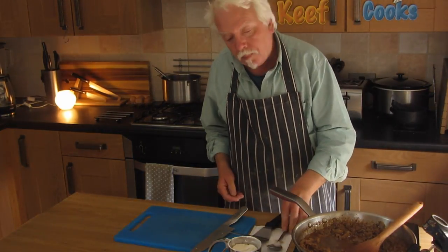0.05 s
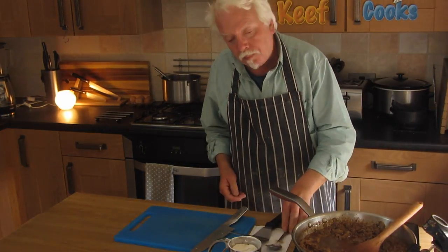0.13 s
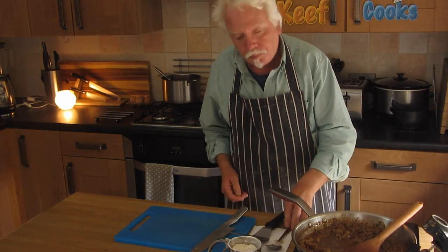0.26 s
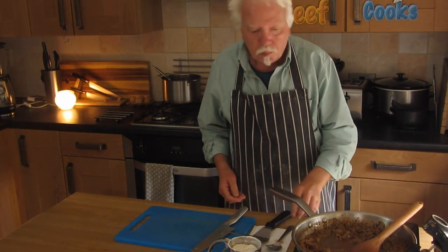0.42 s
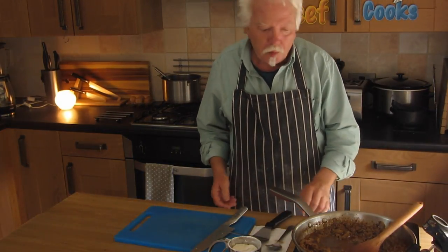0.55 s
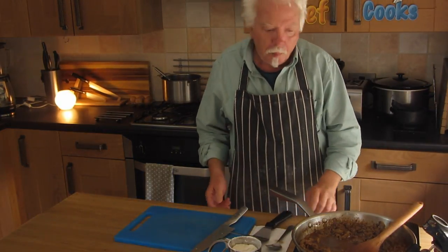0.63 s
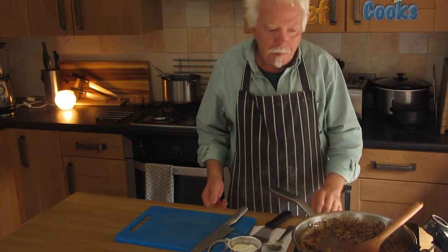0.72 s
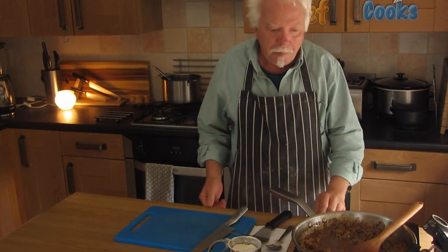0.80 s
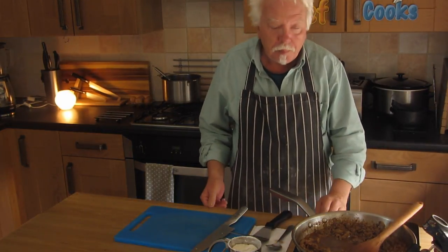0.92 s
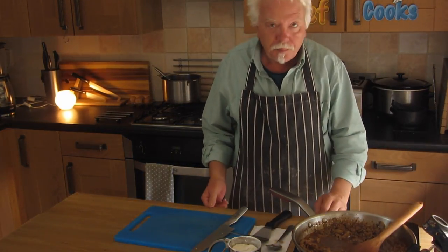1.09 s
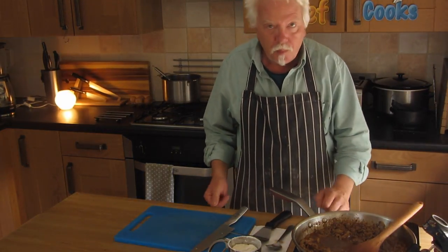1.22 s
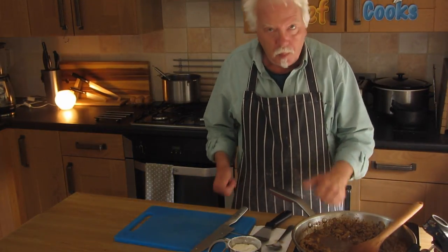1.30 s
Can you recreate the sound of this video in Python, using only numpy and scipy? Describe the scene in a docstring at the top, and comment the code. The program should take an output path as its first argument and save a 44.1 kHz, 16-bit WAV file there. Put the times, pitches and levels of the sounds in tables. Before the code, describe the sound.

A portable induction hob's fan rushes, hums and whines throughout, slightly to the left, with a pan faintly simmering. At about 0.2 seconds a hard utensil lands on the worktop with a loud rattling knock that overloads the microphone and rings briefly in the kitchen. Light ticks follow from 0.7 to 1.3 seconds, the clearest at 0.8. Soft low thumps come on the right around 0.2, 0.6 and 1.2 seconds.

```python
"""A fan rushes through a resonant case and whines on four blade harmonics: a portable induction hob
under a simmering pan. A hard utensil is put down on the worktop; the knock rings in the kitchen and
overloads the microphone. Light ticks follow. A few soft low thumps reach mainly the right side."""
import sys
import numpy as np
from scipy import signal
from scipy.fft import rfft, irfft, next_fast_len
from scipy.io import wavfile
from scipy.ndimage import map_coordinates

SR = 44100
rng = np.random.default_rng(int(sys.argv[2]) if len(sys.argv) > 2 else 0)


def generate_wav(sig):
    """Save sig (samples, or channels by samples) to the path in sys.argv[1] as 16-bit PCM at SR."""
    pcm = np.round(np.clip(np.atleast_2d(sig).T, -1, 1) * 32767).astype(np.int16)
    wavfile.write(sys.argv[1], SR, pcm)


N = 59535


def amp(db):
    return 10 ** (np.asarray(db) / 20)


def unit_rms(x):
    return x / np.sqrt(np.mean(x ** 2) + 1e-20)


def along(points, hz):
    """Interpolate (f/Hz, value) rows on a log axis."""
    point_hz, values = np.transpose(points)
    return np.interp(np.log(hz + 1), np.log(point_hz + 1), values)


def since(start_s):
    """Seconds since the start, zero before."""
    return np.maximum(np.arange(N) / SR - start_s, 0)


def decay(start_s, t60_s):
    """Sudden onset, exponential fall."""
    return (since(start_s) > 0) * amp(-60 * since(start_s) / t60_s)


def pan(db):
    """Gains for a left-minus-right level."""
    return amp(np.array([[db], [-db]]) / 2)


def wobble(knots_per_s):
    """Smooth random curve."""
    return map_coordinates(rng.standard_normal(256), [np.arange(N) * knots_per_s / SR], mode="mirror")


def filtered(x, gain_at_hz):
    """Zero-phase FFT filter."""
    size = next_fast_len(N + SR // 2)
    hz = np.fft.rfftfreq(size, 1 / SR)
    return irfft(rfft(x, size) * gain_at_hz(hz), size)[..., :N]


def lowpass(x, edge_hz, order):
    return filtered(x, lambda hz: 1 / np.sqrt(1 + (hz / edge_hz) ** (2 * order)))


def stereo_noise():
    """White noise, less alike between the sides in the bass."""
    # f/Hz, left-right correlation
    coherence = [(60, 0.24), (130, 0.27), (290, 0.78), (1400, 0.84), (3000, 0.52), (6000, 0.93)]

    def mid_side_gains(hz):
        angle = np.arccos(np.clip(along(coherence, hz), -1, 1)) / 2
        return np.array([np.cos(angle), np.sin(angle)])

    mid, side = filtered(rng.standard_normal((2, N)), mid_side_gains)
    return np.array([mid + side, mid - side])


def coloured_noise(spectrum):
    """Stereo, rms 1, shaped by (f/Hz, level/dB) rows."""
    return unit_rms(filtered(stereo_noise(), lambda hz: amp(along(spectrum, hz))))


def tone(hz, rms_db, detune, flutter_db):
    """Sine, unsteady in pitch and level."""
    turns = np.cumsum(hz * (1 + detune)) / SR + rng.random()
    return np.sqrt(2) * amp(rms_db + flutter_db * wobble(15)) * np.sin(2 * np.pi * turns)


def kitchen(x):
    """Room reverb: quick build-up, each frequency dying at its own rate."""
    # reverb time: f/Hz, t60/s
    room_t60 = [(150, .35), (700, 0.45), (2200, 0.45), (6000, 0.49)]
    build_s = 0.0027
    hz, t, spectra = signal.stft(stereo_noise(), SR, nperseg=256)
    fade = amp(-60 * t / along(room_t60, hz)[:, None])
    tail = signal.istft(spectra * fade, SR, nperseg=256)[1][:, :N]
    tail *= 1 - np.exp(-since(0) / build_s)
    return signal.fftconvolve(np.atleast_2d(x), tail / np.linalg.norm(tail[0]), axes=1)[:, :N]


def near_surfaces(x):
    """Dense early echoes from worktop and pan."""
    echoes = rng.standard_normal(N) * decay(0, t60_s=0.051)
    return signal.fftconvolve(x, echoes / np.linalg.norm(echoes))[:N]


def rumble():
    """Steady low room noise."""
    # noise density: f/Hz, level/dB
    spectrum = [(10, -11.5), (22, 3), (45, -2.5), (75, -15), (200, -48), (1000, -120)]
    return amp(-45.5) * coloured_noise(spectrum) * pan(db=-3)


def hob():
    """Fan air in the resonant case, blade harmonics on one shaft speed, hum and a faint pan ring."""
    # fan air density: f/Hz, level/dB
    air_spectrum = [(50, -23.5), (95, -17.5), (150, -11.5), (205, -9), (270, -10), (325, 3.5), (420, 4.5),
                    (475, -6), (545, 3.5), (640, -7.5), (1050, -6), (1300, -11), (1520, -13), (1950, -10.5),
                    (2300, -21), (2750, -18), (3200, -23), (4300, -25.5), (6100, -31.5)]
    # blade harmonics: multiple, level/dB
    harmonics = [(6, -40.5), (7, -38.5), (8, -42), (9, -41.5)]
    # steady hum lines and a faint high pan ring: f/Hz, level/dB
    steady_lines = [(366, -37.5), (430, -42.5), (1249.5, -48), (2632, -59)]
    blade_hz = 142.9
    air = amp(-26.5) * coloured_noise(air_spectrum)
    shaft_drift = 0.00077 * wobble(5.5)
    whine = sum(tone(round(k) * blade_hz, db, shaft_drift, flutter_db=0.95) for k, db in harmonics)
    tones = sum(tone(hz, db, detune=0.0021 * wobble(11.93), flutter_db=0.5) for hz, db in steady_lines)
    return (air + tones) * pan(db=-3) + whine * pan(db=-5)


def simmer():
    """Tiny random pops from the pan, each a burst of band noise."""
    pops_per_s, centre_hz, width_oct = 120, 3520, 1
    pops = (rng.random(N) < pops_per_s / SR) * amp(-41 + 4 * rng.standard_normal(N))
    envelope = signal.fftconvolve(pops, decay(0, t60_s=0.0057))[:N]
    band = lambda hz: np.exp(-0.5 * (np.log2((hz + 1) / centre_hz) / width_oct) ** 2)
    return envelope * unit_rms(filtered(rng.standard_normal(N), band))


def thumps():
    """Soft low bumps of two or three cycles, mainly right."""
    # crests: t/s, level/dB
    crests = [(.135, -24.5), (0.203, -14), (0.243, -11), (0.366, -30.5), (0.618, -18.5), (1.136, -26.5),
              (1.202, -13)]
    hz, rise_s, fall_s, left_db = 33.7, 0.011, 0.029, -15.5
    bumps = np.zeros(N)
    for crest_s, db in crests:
        t = np.arange(N) / SR - crest_s
        envelope = np.exp(-np.abs(t) / np.where(t < 0, rise_s, fall_s))
        bumps += amp(db) * envelope * np.cos(2 * np.pi * hz * t)
    return bumps * amp([[left_db], [0]])


def ticks():
    """Light ticks, each a few fast-dying modes of alternating sign."""
    # ticks: t/s, level/dB, f/Hz
    events = [(0.6843, -25.5, 2900), (.701, -30.5, 4200), (0.7457, -30, 5300), (.819, -12.5, 3677),
              (0.868, -34.5, 3900), (0.918, -32.5, 5500), (1.272, -31.5, 3600)]
    # tick modes: frequency ratio, level/dB
    modes = [(.72, -2.5), (1, 1.5), (1.24, 1), (1.52, -2)]
    clicks = np.zeros(N)
    for start_s, db, hz in events:
        phase = 2 * np.pi * hz * since(start_s)
        ring = sum((-1) ** k * amp(mode_db) * np.sin(ratio * phase)
                   for k, (ratio, mode_db) in enumerate(modes))
        clicks += amp(db) * decay(start_s, t60_s=0.0062) * ring
    return clicks


def knock():
    """The utensil touches, lands and rattles; each contact cracks and feeds the same modes."""
    # contacts: t/s, level/dB
    contacts = [(0.203, -21.5), (0.2066, 1.5), (0.2159, -4), (0.2246, -8.5), (0.2325, -8.5)]
    # contact noise density: f/Hz, level/dB
    crack_spectrum = [(60, -28.5), (170, -25), (240, 0), (290, -3), (450, 3), (590, -9), (690, 6),
                      (790, -2.5), (950, -1), (1100, -0.5), (1400, -13), (1800, 3), (2800, 0), (3400, -7),
                      (4400, -11), (6000, -18.5)]
    # struck modes: f/Hz, level/dB, t60/s
    modes = [(140, -22, .5), (228, -8, .2), (450, -7, .2), (686, -8, .5), (925, -7, .48), (1163, -13, .42),
             (1622, -5, .15), (1843, -11, .48), (1975, -9, .42), (2180, -9, .33), (2417, -9, .32),
             (2553, -6, .24), (2632, -15, .85), (3219, -19, .38)]
    crack_db, ring_db, room_db, blur_turns = 1.5, -10, 2, 0.11
    crack = sum(amp(db + crack_db) * decay(start_s, t60_s=0.039) * coloured_noise(crack_spectrum)
                for start_s, db in contacts)
    ring = np.zeros(N)
    for hz, mode_db, t60_s in modes:
        energy = sum((amp(db) * decay(start_s, t60_s)) ** 2 for start_s, db in contacts)
        turns = hz * since(0) + rng.random() + blur_turns * wobble(39.92)
        ring += amp(ring_db + mode_db) * np.sqrt(energy) * np.sin(2 * np.pi * turns)
    return (ring + crack + amp(room_db) * kitchen(crack)) * pan(db=0.5)


def scene():
    """Hob, knock, simmer and ticks, treble cut steeply, over thumps and rumble."""
    low = thumps() + rumble()
    mix = hob() + knock()
    patter = simmer() + ticks()
    mix += (patter + amp(-2.5) * near_surfaces(patter) + amp(-6) * kitchen(patter)) * pan(db=-3.5)
    return lowpass(mix, edge_hz=6270, order=45) + low


def record(dry):
    """Microphone overload: clipping at full scale, then a band limit."""
    hardness = 22
    clipped = dry / (1 + np.abs(dry) ** hardness) ** (1 / hardness)
    return lowpass(clipped, edge_hz=15500, order=60)


dry = scene()
out = record(dry)
generate_wav(out)
```